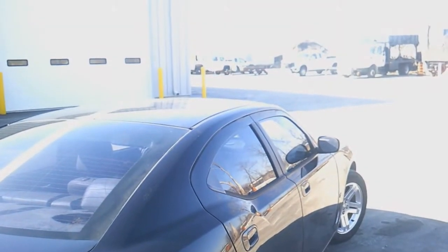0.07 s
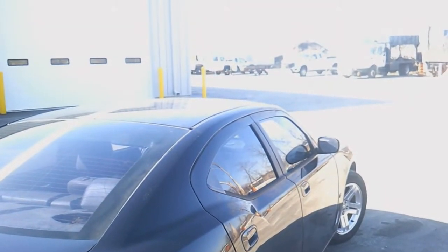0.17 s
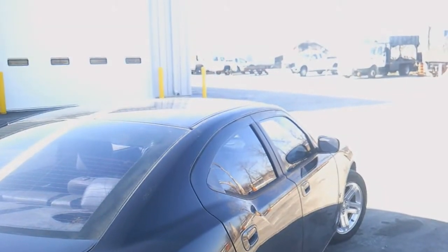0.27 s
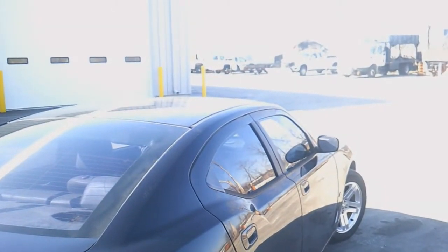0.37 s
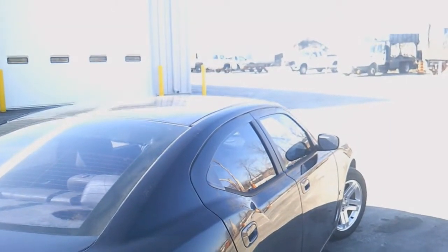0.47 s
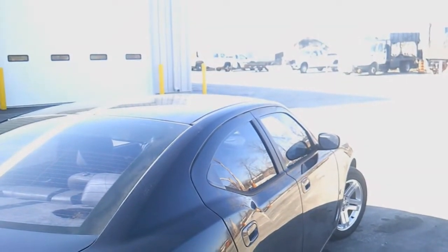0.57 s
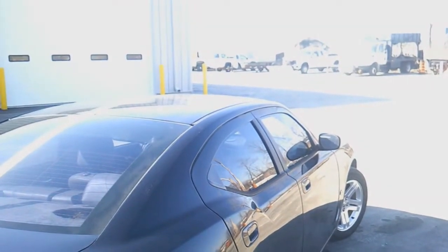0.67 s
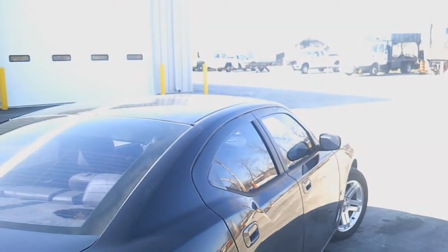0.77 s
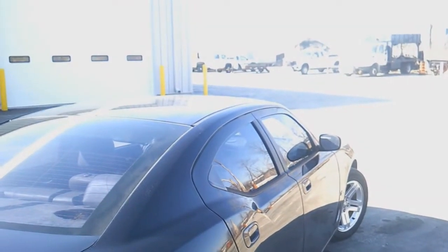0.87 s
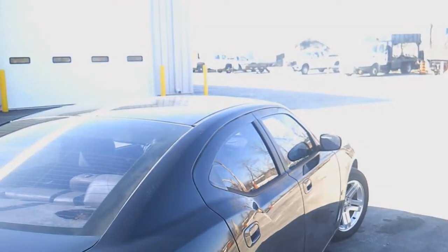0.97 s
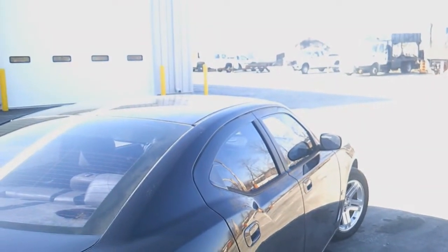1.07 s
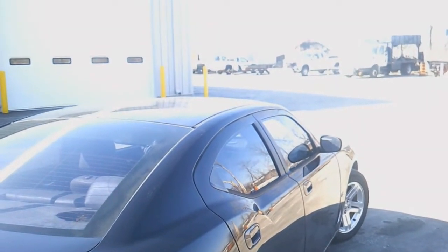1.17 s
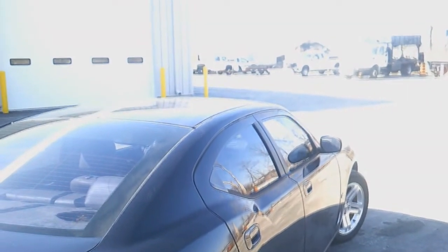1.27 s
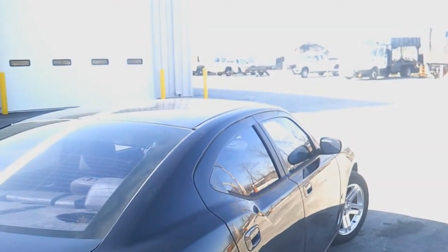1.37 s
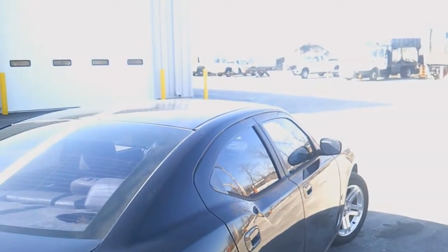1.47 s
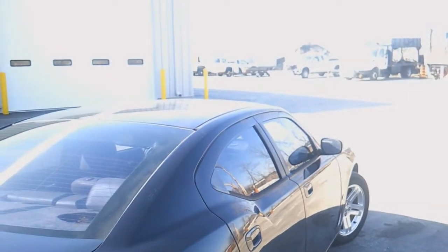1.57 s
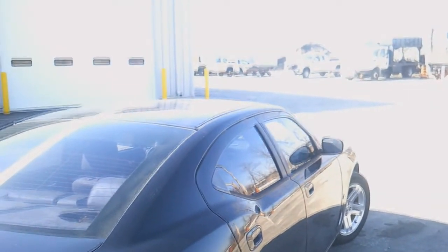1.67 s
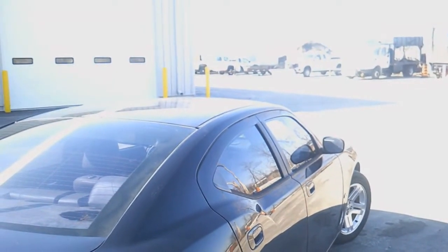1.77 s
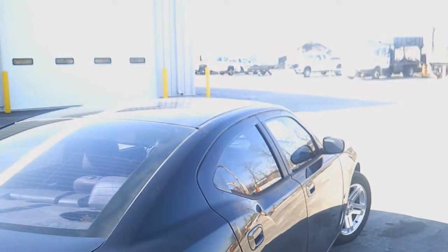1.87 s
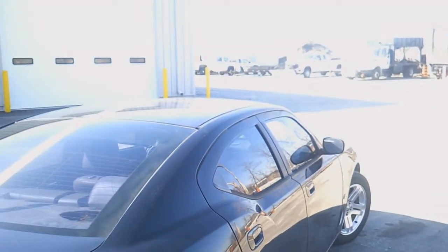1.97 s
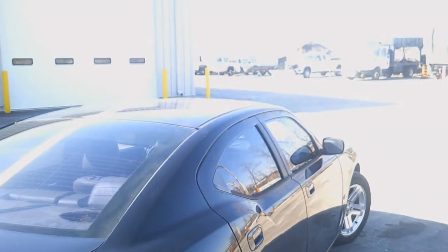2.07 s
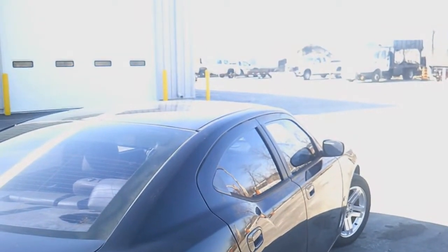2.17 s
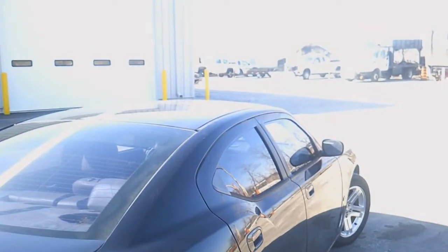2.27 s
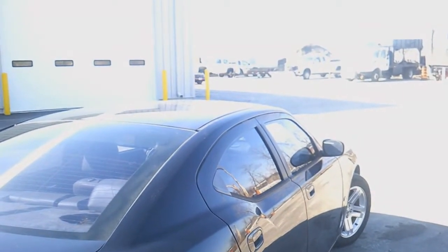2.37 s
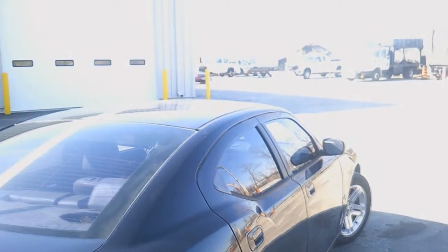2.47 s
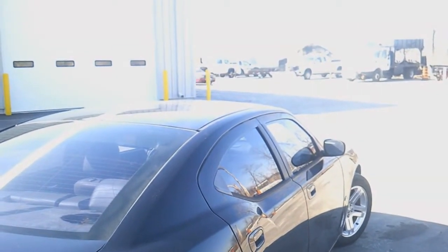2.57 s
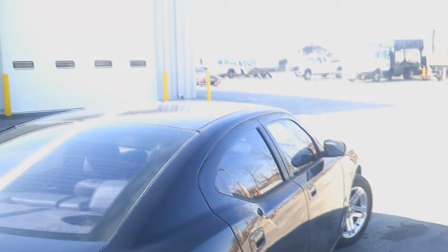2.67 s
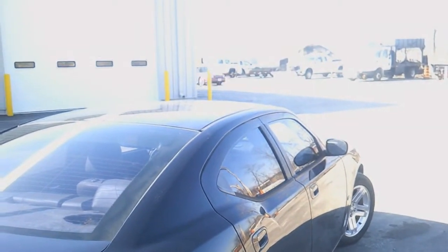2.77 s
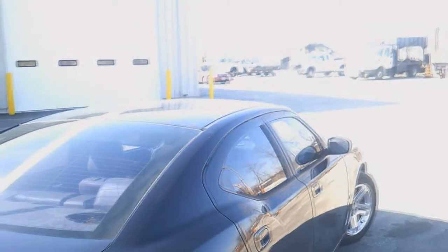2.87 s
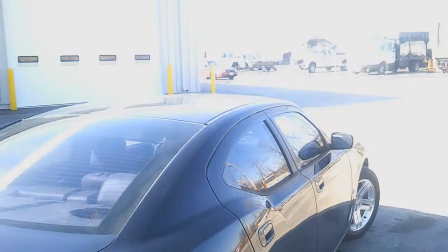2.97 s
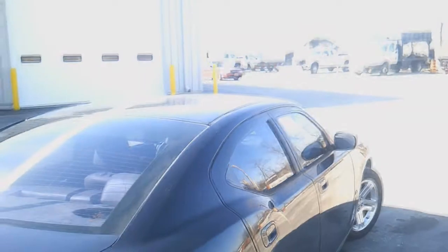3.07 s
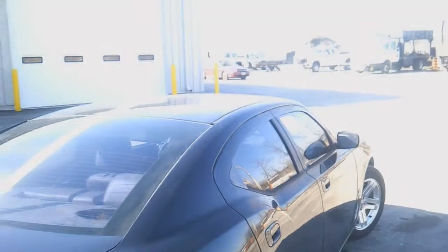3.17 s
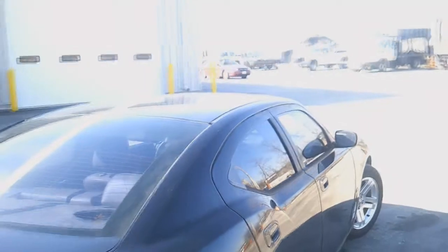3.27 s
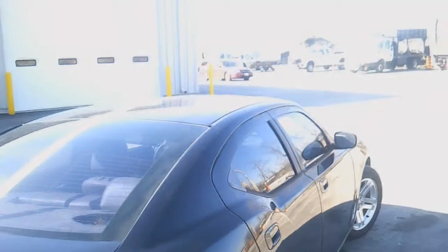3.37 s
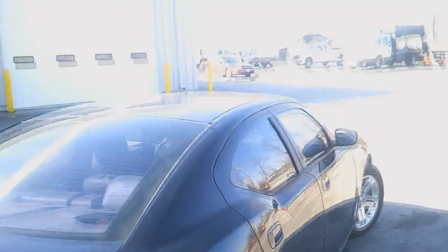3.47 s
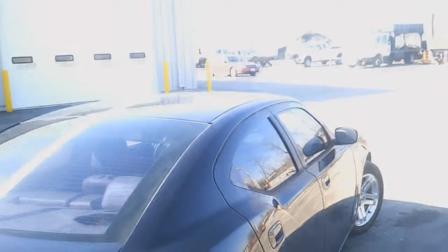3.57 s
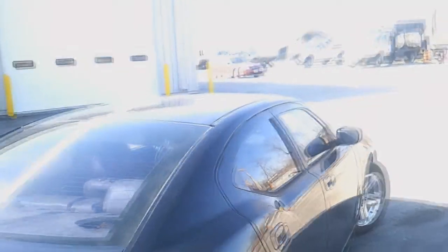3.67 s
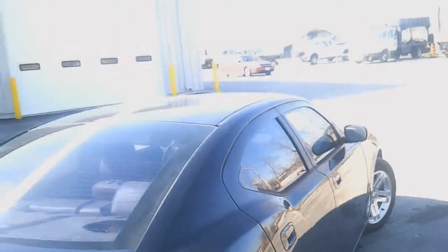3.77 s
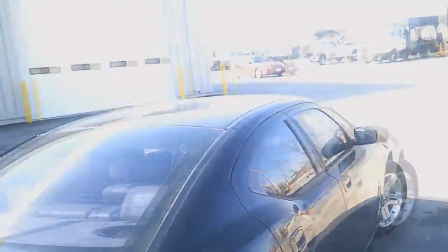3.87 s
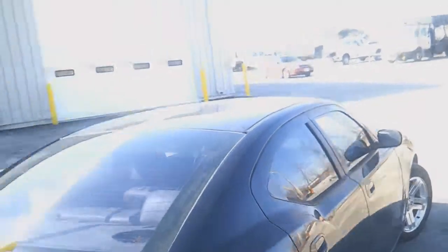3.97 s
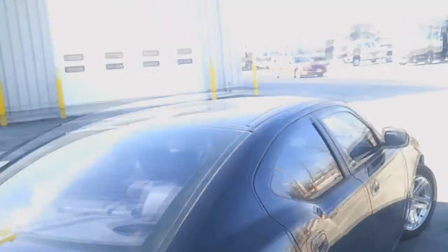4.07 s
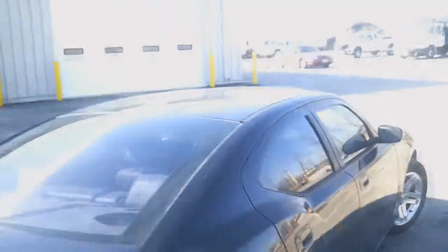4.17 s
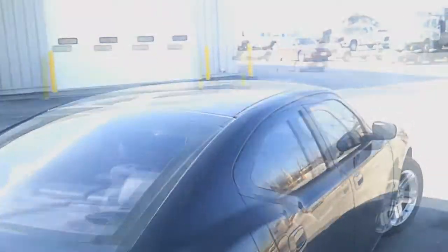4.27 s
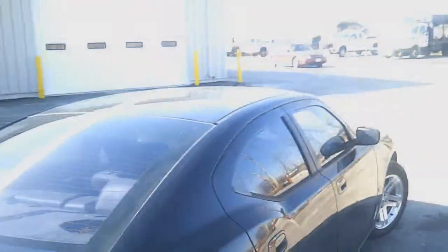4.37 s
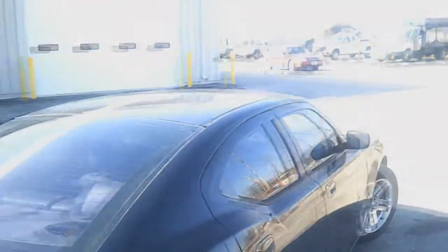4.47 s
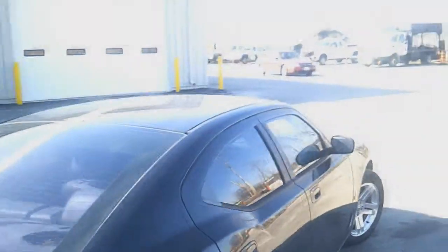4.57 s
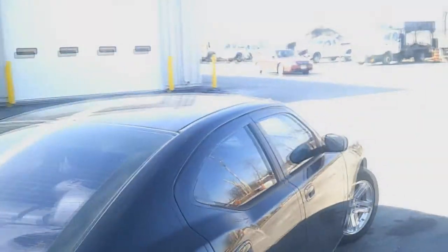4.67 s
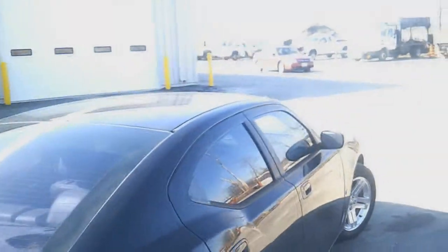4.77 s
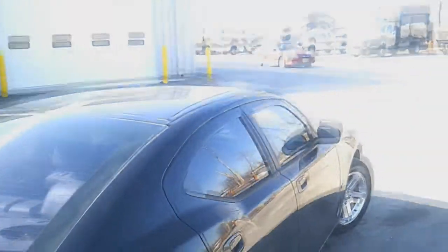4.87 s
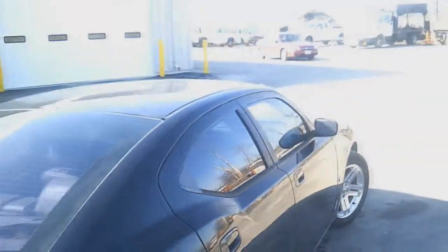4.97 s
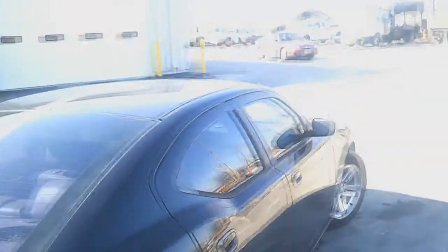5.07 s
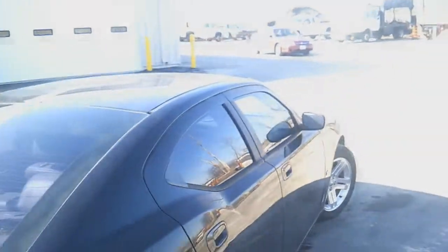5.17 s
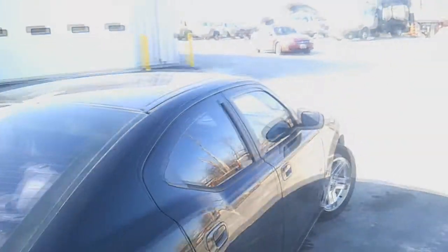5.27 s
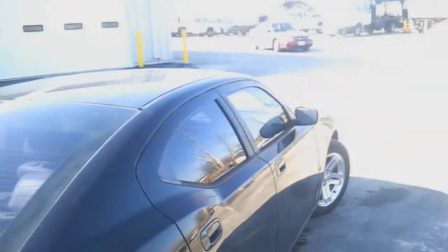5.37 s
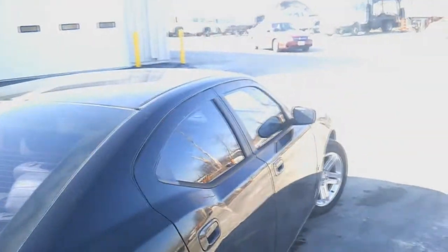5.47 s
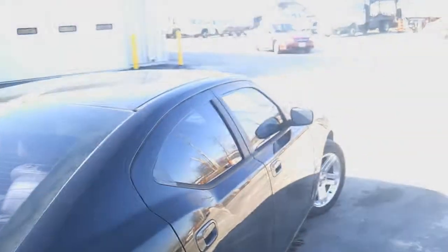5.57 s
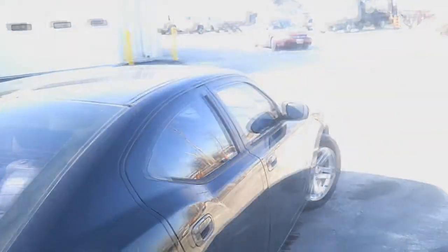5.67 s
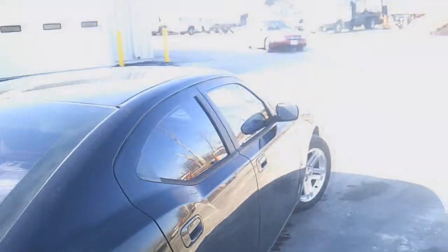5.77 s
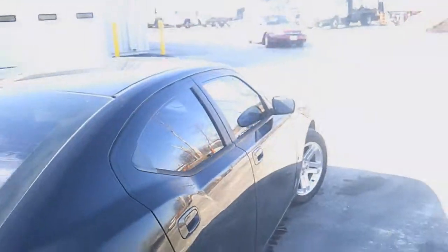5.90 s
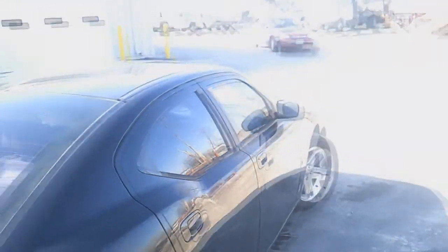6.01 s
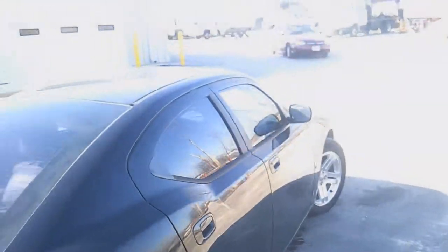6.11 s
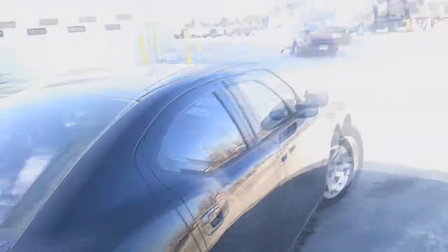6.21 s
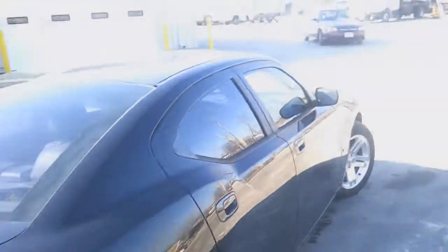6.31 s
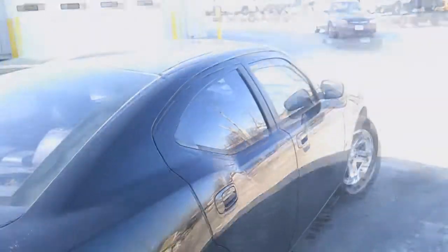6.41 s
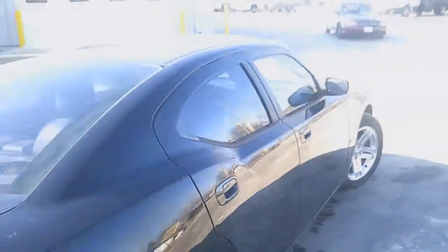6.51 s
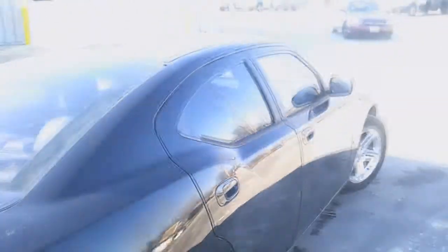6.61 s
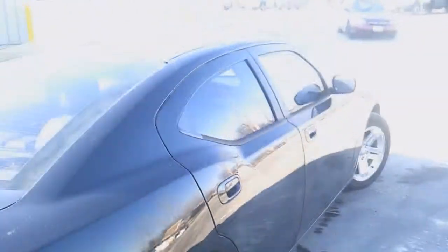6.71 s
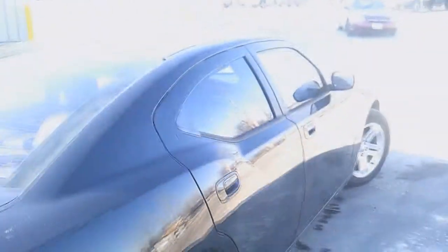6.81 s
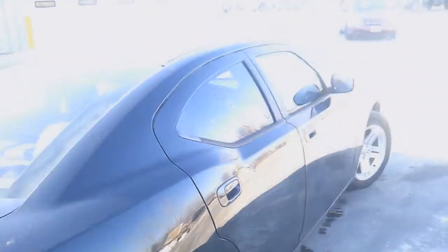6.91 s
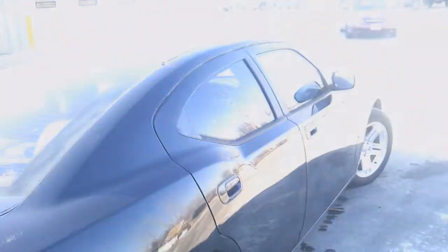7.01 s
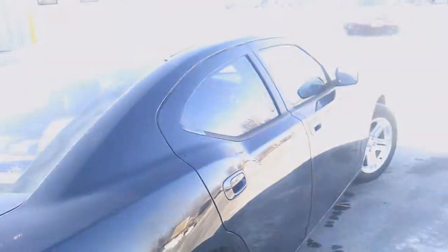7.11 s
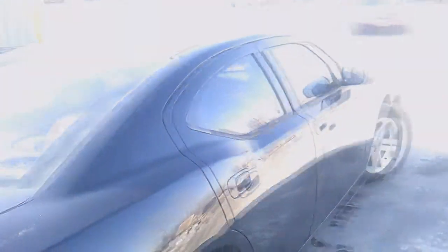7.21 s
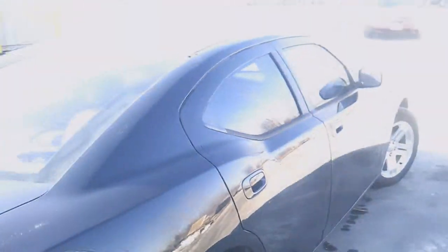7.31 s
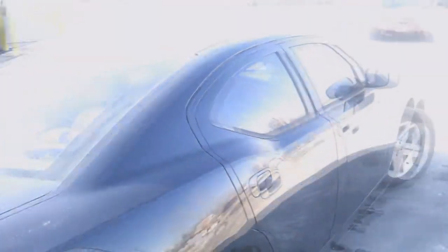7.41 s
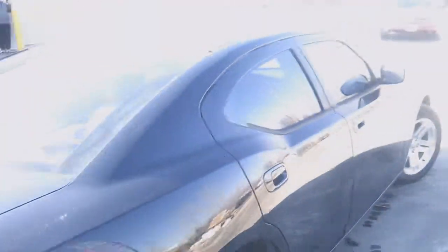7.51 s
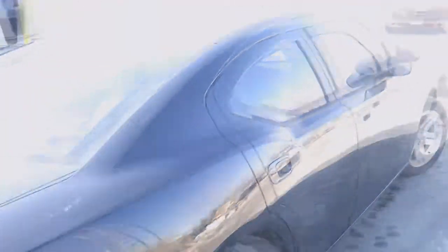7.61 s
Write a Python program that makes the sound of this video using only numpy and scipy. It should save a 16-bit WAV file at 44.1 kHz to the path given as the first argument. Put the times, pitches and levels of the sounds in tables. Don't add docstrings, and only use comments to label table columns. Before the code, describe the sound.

Low exhaust hum and dull lot roar, one faint far horn tap, then gritty tyre crackles and growing wind thumps on a small microphone.

```python
import sys
import numpy as np
from scipy import signal
from scipy.fft import rfft, irfft, next_fast_len
from scipy.io import wavfile
from scipy.ndimage import uniform_filter1d

SR = 44100
rng = np.random.default_rng(int(sys.argv[2]) if len(sys.argv) > 2 else 0)


def waveform_to_disk(signal):
    frames = np.transpose(np.atleast_2d(signal))
    scaled = np.clip(frames, -1, 1) * 32767
    samples = np.round(scaled).astype(np.int16)
    wavfile.write(sys.argv[1], SR, samples)


def convert_level_to_amplitude(level_db):
    exponent = np.asarray(level_db, float) / 20
    return 10 ** exponent


N = 337365
T = np.arange(N) / SR
SIZE = next_fast_len(N)
HZ = np.maximum(np.arange(SIZE // 2 + 1) * SR / SIZE, 1)

# time in seconds, firing rate in Hz, exhaust brightness in dB.
ENGINE_IDLE = [(0, 30.8, -1), (1.6, 30.62, 0.5), (2, 30.28, 1), (2.4, 29.45, -0.5), (2.9, 29.18, -1),
               (3.4, 29.39, 0), (3.9, 29.58, -1.5), (4.3, 29.9, 0), (4.7, 30.6, -4.5), (5.1, 30.96, -5),
               (5.6, 30.69, -4.5), (6, 30.73, 1), (6.9, 30.62, 1.5), (7.2, 30.26, 1.5), (7.45, 29.76, 5),
               (7.65, 29.45, -1.5)]
# multiple of the firing rate, resonance in Hz, its width
# in Hz, level on the resonance in dB, share of the brightness (below 0 works against it).
STRONG_TONES = [(3, 93, 3.3, -46.5, 0.25), (4, 122.5, 6.5, -43, -0.2), (7, 206, 6.34, -40.5, 0.92)]
# multiple of the firing rate, level in dB.
WEAK_TONES = [(1, -46.5), (2, -52.5), (5, -64.5), (6, -67.5), (8, -60)]
# pitch in Hz, width in Hz, level in dB.
PIPE_RINGS = [(93, 16, -53), (125.6, 20, -53), (205.1, 27.5, -47.5), (240, 24, -61)]

# time in seconds, peak in dB, length in seconds,
# level in dB of the quicker heave riding on it.
ROCKING_GUSTS = [(0.048, -42, 0.054, -32.5), (0.23, -34, 0.062, -38.5), (0.48, -26.5, 0.069, -47.5),
                 (0.832, -29.5, 0.043, -45), (1.06, -43, 0.077, -35.5), (1.302, -31, 0.032, -48),
                 (1.618, -33, 0.058, -49), (1.838, -29, 0.066, -50), (2.305, -32, 0.071, -43.5),
                 (2.513, -25, .08, -38.5), (3.002, -24.5, .1, -40.5), (3.298, -27, 0.14, -33),
                 (3.597, -18, 0.1, -26), (3.878, -19.5, 0.068, -27.5), (4.107, -21, .09, -28.5),
                 (4.375, -13.5, 0.073, -24.5), (4.542, -22.5, 0.025, -24.5), (4.8, -24.5, 0.14, -35.5),
                 (5.138, -19, 0.074, -36.5), (5.3, -27, 0.041, -42), (5.605, -16, .07, -27),
                 (5.871, -17.5, 0.047, -24), (6.134, -15, 0.12, -28), (6.437, -15, 0.074, -36),
                 (6.598, -17, 0.1, -35.5), (6.99, -27, 0.1, -30), (7.203, -25.5, 0.073, -29.5),
                 (7.553, -21, 0.11, -34)]
CALM_DB, CALM_HEAVE_DB = -43.5, -55.5
HEAVE_STRETCH = 1.6
# frequency in Hz, level in dB per Hz.
HEAVE_COLOUR = [(10, -7.5), (14, 8.5), (20, -2), (28, -7.5), (36, -23)]
# time in seconds, rumble level in dB.
WIND_STRENGTH = [(0, -43.5), (.45, -48), (.72, -57), (.95, -38.5), (1.15, -42.5), (1.5, -43.5),
                 (2.5, -48.5), (2.85, -45), (3.1, -42.5), (3.5, -40.5), (4.6, -38), (5.05, -44), (5.3, -39),
                 (5.9, -44), (6.5, -41), (7.05, -37.5), (7.3, -35), (7.65, -42.5)]
# frequency in Hz, level in dB per Hz.
RUMBLE_COLOUR = [(24, -11.5), (35, 0.5), (50, -4.5), (70, -9), (110, -8), (140, -20), (170, -33.5),
                 (260, -39)]
# time in seconds, flutter in dB, length in seconds.
WIND_FLURRIES = [(.05, -61.5, .2), (1, -60.5, 0.16), (2, -64.5, 0.24), (3.5, -64.5, 0.26), (4.82, -46, 0.1),
                 (5.06, -47, 0.068), (5.38, -48.5, .12), (5.61, -41, .08), (5.78, -53, .08),
                 (6.1, -52.5, 0.18), (6.52, -49, .1), (6.71, -40, 0.038), (7.05, -50.5, .15),
                 (7.6, -49, .2)]
STILL_DB = -65
SHOVE_DB, SHOVE_SLOPE = 11, 2.2
# frequency in Hz, level in dB per Hz.
FLUTTER_COLOUR = [(70, -12), (130, 3), (200, -4.5), (300, -8), (450, -19.5), (700, -31.5)]
# time in seconds, peak in dB, pitch of
# the single swing in Hz.
EDDY_POPS = [(4.6976, -41, 360.6), (4.8068, -35, 260.4), (5.0018, -34, 341), (5.0731, -35, 397),
             (5.083, -34.5, 322.6), (5.288, -36, 311), (5.3222, -38.5, 298.5), (5.3915, -35, 333.2),
             (5.3998, -34.5, 431), (5.4139, -38.5, 358), (5.4226, -30, 275), (5.5256, -25.5, 381),
             (5.557, -36, 262.7), (5.5816, -36, 353.3), (5.6073, -26, 243), (5.6159, -34, 238),
             (5.6235, -32.5, 330), (5.6442, -30, 299), (5.6597, -25.5, 340), (5.7197, -40, 330),
             (5.8044, -32.5, 246.4), (6.1363, -29, 571.3), (6.2541, -30, 739), (6.5414, -26, 396),
             (6.6795, -29.5, 245.8), (6.6906, -22, 283.4), (6.709, -20, 310), (6.7312, -26.5, 324),
             (7.0518, -36.5, 341),
             (5.604, -19, 170), (6.6886, -23, 248), (6.6962, -28.5, 410), (6.7025, -36, 240),
               (6.746, -46.5, 203), (7.591, -38, 300), (4.739, -38.5, 200), (4.759, -39, 220),
               (4.826, -37.5, 258), (4.986, -42.5, 218), (5.34, -31, 193), (5.755, -35.5, 420),
               (6.871, -41.5, 350)]

# time in seconds, roar in dB, treble tilt in dB.
LOT_LEVEL = [
    (0.0, -48, -1),
    (1.21, -49, -3),
    (3.17, -49, -1.5),
    (3.81, -48.5, -2.5),
    (4.11, -48, -2.5),
    (5.5, -47.5, -2),
    (6.37, -45.5, 2),
    (6.75, -47.5, -3),
    (7.65, -46.5, 5),
]
# frequency in Hz, level in dB per Hz.
ROAR_COLOUR = [(220, -29.5), (250, -9.5), (300, 0), (370, -7), (525, -3), (740, -3.5), (1010, -3.5),
               (1220, -6), (1490, -3.5), (2280, -6), (2600, -7), (2900, -12), (3250, -24), (3600, -49.5)]
# pitch in Hz, width in Hz, level in dB.
STEADY_WHINES = [(558, 68, -64.5), (1396, 61, -67), (2575, 40, -66)]
# time in seconds, peak in dB, pitch in Hz.
GRIT_CRACKS = [(1.232, -38, 1390), (2.711, -36, 1757), (3.548, -41, 1430), (3.785, -39, 1540),
               (3.953, -48, 1300), (5.315, -47, 903), (5.93, -45, 1550), (6.124, -37, 1710),
               (6.253, -36, 1080), (6.306, -36, 1410), (6.36, -38, 1580), (6.524, -35, 1590),
               (6.535, -35, 1290), (6.615, -37, 1730), (7.132, -35, 1904), (7.367, -33, 1350),
               (7.473, -35, 1594)]
# start in seconds, length in seconds,
# pitch in Hz, width in Hz, level in dB.
BELT_AND_TYRE_SQUEALS = [(0, 2.2, 2733, 50, -66), (0.357, 0.36, 1159, 10, -57),
                         (0.344, 0.86, 1433, 19, -61), (1.85, 0.42, 1164, 10, -62),
                         (1.6, 1.65, 2561, 30, -64), (2.203, .7, 2455, 33, -63),
                         (3.519, .06, 1675, 40, -54), (3.985, 0.048, 1490, 84, -50.5),
                         (4.3, .25, 2530, 25, -59), (3.897, 0.91, 2600, 67, -62),
                         (4.998, 2.8, 1352, 50, -61), (7.102, 0.34, 2522, 14, -57.5)]

# frequency in Hz, level in dB per Hz.
HISS_COLOUR = [(2900, -17.5), (3200, -3), (3530, -7.5), (3900, -11), (4500, -14.5), (4900, -22),
               (5300, -20.5), (5950, -18), (6600, -16), (7300, -14), (7700, -16), (8350, -27),
               (9050, -39.5), (16000, -38)]
HISS_DB = -75
# time in seconds, peak in dB, pitch in Hz.
BODY_TICKS = [
    (.218, -56, 3490),
    (.218, -56, 4490),
    (.218, -60, 5770),
    (.218, -57.5, 7300),
    (3.892, -64.5, 4150),
    (6.254, -66, 4340),
    (6.483, -57, 3900),
    (6.483, -70, 6000),
]
# time in seconds, length in seconds,
# rise over the hiss in dB.
TYRE_SCUFFS = [
    (1.249, 0.032, 3.5),
    (3.615, 0.048, 2),
    (3.884, 0.036, 3),
    (6.105, .1, 3.5),
    (6.274, .05, 6.5),
    (6.486, 0.067, 7.5),
    (7.097, 0.13, 3),
]

# pitch in Hz, list of the levels of its harmonics in dB.
HORN_TONES = [
    (517, [-59, -61, -60.5, -64.5, -67]),
    (436.6, [-68, -57, -70, -67.5, -71]),
]
HORN_SAG = [4.5, -35]
HORN_START_S, HORN_LENGTH_S, HORN_RISE_S, HORN_TAIL_S = 3.52, 0.3, 0.013, 0.067
HORN_SCOOP, HORN_SCOOP_S = .05, 0.049
HORN_WAVER_DB = 3
HORN_BLUR = .03


def curves(table):
    s, *columns = np.transpose(table)
    return [np.interp(T, s, c) for c in columns]


def unit(x):
    return x / np.sqrt(np.mean(x ** 2))


def walk(rate):
    hold = int(SR / rate)
    steps = np.repeat(rng.standard_normal(N // hold + 1), hold)
    smooth = uniform_filter1d(uniform_filter1d(steps, hold), hold)
    return unit(smooth[:N])


def colour(points):
    hz, db = np.transpose(points)
    return convert_level_to_amplitude(np.interp(np.log(HZ), np.log(hz), db, -200, -200))


def ring(x, hz, width_hz):
    b, a = signal.iirpeak(hz, hz / width_hz, SR)
    return unit(signal.lfilter(b, a, signal.lfilter(b, a, x)))


def patchy(points, swell_db, flicker_db, rate, tilt_db=0):
    spectrum = rfft(rng.standard_normal(SIZE)) * colour(points)
    octave = np.log2(HZ / points[0][0])
    centres = np.arange(0, np.log2(points[-1][0] / points[0][0]) + .5, .5)
    swell = swell_db * walk(rate / 5)
    out = 0
    for c in centres:
        share = np.cos(np.pi * np.clip(octave - c, -.5, .5)) ** 2
        tilt = tilt_db * (c / centres[-1] - .5)
        gain = convert_level_to_amplitude(swell + flicker_db * walk(rate) + tilt)
        out = out + gain * irfft(spectrum * share, SIZE)[:N]
    return unit(out)


def swings(rows, cycles, point=2):
    out = np.zeros(N)
    t = np.arange(-1024, 1024) / SR
    for (s, db, hz), chance in zip(rows, rng.random((len(rows), 1))):
        at = int(s * SR) - 1024
        bell = np.exp(-np.abs(2 * t * hz / cycles) ** point)
        out[at:at + 2048] += convert_level_to_amplitude(db) * bell * np.sin(2 * np.pi * (hz * t + chance))
    return out


def bells(rows, floor_db):
    t = T[::64]
    total = convert_level_to_amplitude(floor_db)
    for s, db, length in rows:
        total = total + convert_level_to_amplitude(db) * np.exp(-.5 * ((t - s) / length) ** 2)
    return np.interp(T, t, 20 * np.log10(total))


def engine():
    hz, bright_db = curves(ENGINE_IDLE)
    strong = []
    for k, f, w, db, share in STRONG_TONES:
        off_pitch_db = 10 * np.log10(1 + (2 * (round(k) * hz - f) / w) ** 2)
        strong.append((round(k), db + share * bright_db - off_pitch_db))
    turns = np.cumsum(hz) / SR + .012 * walk(7)
    hum = 0
    for k, db in [*strong, *WEAK_TONES]:
        level = convert_level_to_amplitude(db + 0.87 * walk(15) + 3.5 / k * walk(3.7))
        hum = hum + level * np.sqrt(2) * np.sin(2 * np.pi * (k * turns + rng.random()))
    fired = np.diff(np.floor(np.maximum.accumulate(turns)), prepend=0)
    scatter = fired * rng.standard_normal(N) + .02 * rng.standard_normal(N)
    uneven = convert_level_to_amplitude(-.25 * (strong[-1][1] + 51.0))
    return hum + uneven * sum(convert_level_to_amplitude(db) * ring(scatter, f, w) for f, w, db in PIPE_RINGS)


def wind():
    gust_db = bells([row[:-1] for row in ROCKING_GUSTS], CALM_DB)
    heave_rows = [(s, db, HEAVE_STRETCH * length) for s, _, length, db in ROCKING_GUSTS]
    heave_db = bells(heave_rows, CALM_HEAVE_DB)
    flutter_db = bells(WIND_FLURRIES, STILL_DB)
    shove = convert_level_to_amplitude(-42 + SHOVE_DB + SHOVE_SLOPE * (flutter_db + 40.5))
    turns = np.cumsum(7.6 * (1 + .18 * walk(6))) / SR
    buffet = convert_level_to_amplitude(gust_db) * np.sqrt(2) * np.sin(2 * np.pi * (turns - turns[-1]) + .1)
    heave = convert_level_to_amplitude(heave_db - 1.0) * patchy(HEAVE_COLOUR, 0.35, 0.92, 6.4)
    strength = convert_level_to_amplitude(curves(WIND_STRENGTH)[0] + 0.5) + convert_level_to_amplitude(-4) * shove
    rumble = strength * patchy(RUMBLE_COLOUR, 0.59, 1.0, 15)
    flutter = convert_level_to_amplitude(flutter_db + 4.5) * patchy(FLUTTER_COLOUR, 3.2, 2.7, 300)
    pops = convert_level_to_amplitude(4.0) * swings(EDDY_POPS, cycles=0.74, point=1.24)
    return buffet + heave + rumble + flutter + pops


def lot():
    roar_db, tilt_db = curves(LOT_LEVEL)
    roar = patchy(ROAR_COLOUR, 0.64, 0.8, 12, tilt_db)
    whines = 0
    for hz, width_hz, db in STEADY_WHINES:
        level = convert_level_to_amplitude(db + 48.5 + 1.6 * walk(1.4))
        whines = whines + level * ring(rng.standard_normal(N), hz, width_hz)
    grit = convert_level_to_amplitude(-0.5) * swings(GRIT_CRACKS, cycles=3.0)
    return convert_level_to_amplitude(roar_db + 0.48) * (roar + whines) + grit


def squeals():
    out = 0
    for start, length, hz, width_hz, db in BELT_AND_TYRE_SQUEALS:
        to_edge = np.minimum(T - start, start + length - T)
        fade = np.clip(to_edge / min(0.05, 0.49 * length), 0, 1)
        out = out + convert_level_to_amplitude(db) * fade * ring(rng.standard_normal(N), hz, width_hz)
    return out


def hiss():
    scuff_db = sum(db * np.exp(-.5 * ((T - s) / length) ** 2) for s, length, db in TYRE_SCUFFS)
    noise = patchy(HISS_COLOUR, 0.22, 0.73, 25, -1.5 * scuff_db)
    ticks = swings(BODY_TICKS, cycles=4.1)
    return convert_level_to_amplitude(HISS_DB + 0.31 * scuff_db) * noise + ticks


def horn():
    since = np.maximum(T - HORN_START_S, 0)
    tail = np.exp(-np.maximum(since - HORN_LENGTH_S, 0) / HORN_TAIL_S)
    shape = np.clip(since / HORN_RISE_S, 0, 1) * tail
    climb = np.cumsum(1 - HORN_SCOOP * np.exp(-since / HORN_SCOOP_S)) / SR
    blur = HORN_BLUR * walk(30)
    out = 0
    for (hz, harmonics), sag in zip(HORN_TONES, HORN_SAG):
        sag_db = sag * np.minimum(since, HORN_LENGTH_S)
        for k, db in enumerate(harmonics, start=1):
            level = convert_level_to_amplitude(db + sag_db + HORN_WAVER_DB * walk(12))
            turns = k * (hz * climb + blur) + rng.random()
            out = out + level * np.sqrt(2) * np.sin(2 * np.pi * turns)
    return shape * out


def scene():
    return (engine() + wind() + lot() + squeals() + hiss() + horn())[None]


def band_limit(x):
    return signal.sosfilt(signal.butter(12, 15300, fs=SR, output="sos"), x)


def record(dry):
    return band_limit(dry)


dry = scene()
out = record(dry)
waveform_to_disk(out)
```